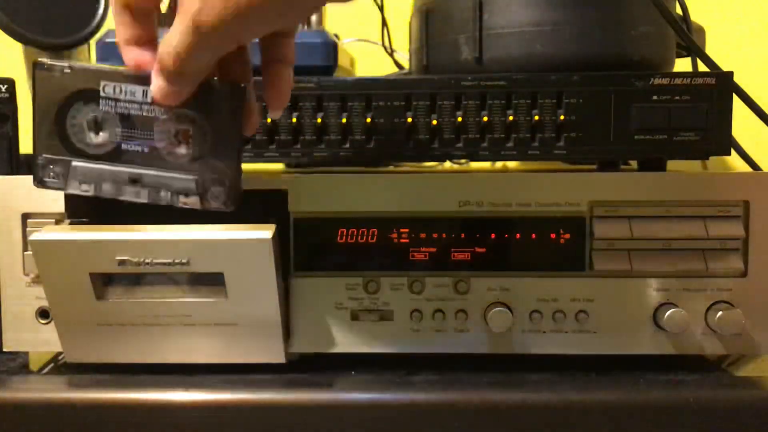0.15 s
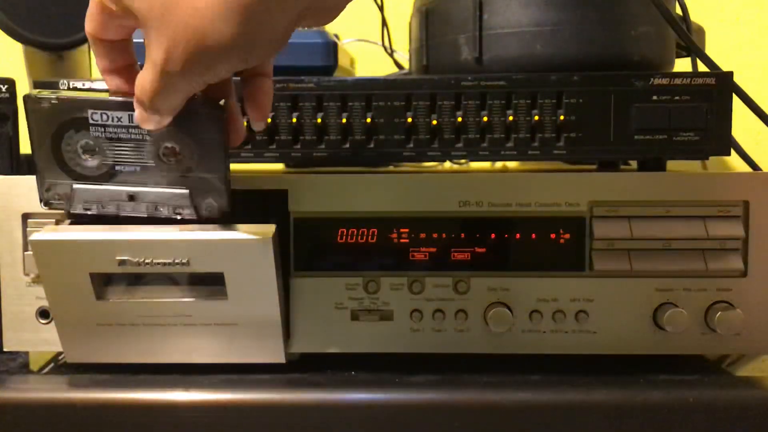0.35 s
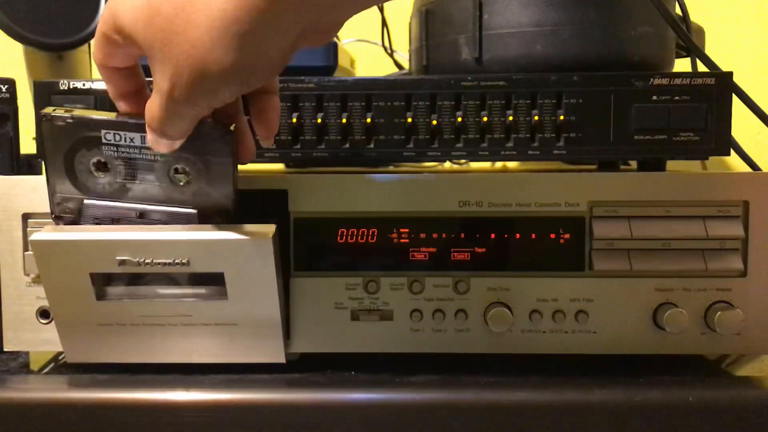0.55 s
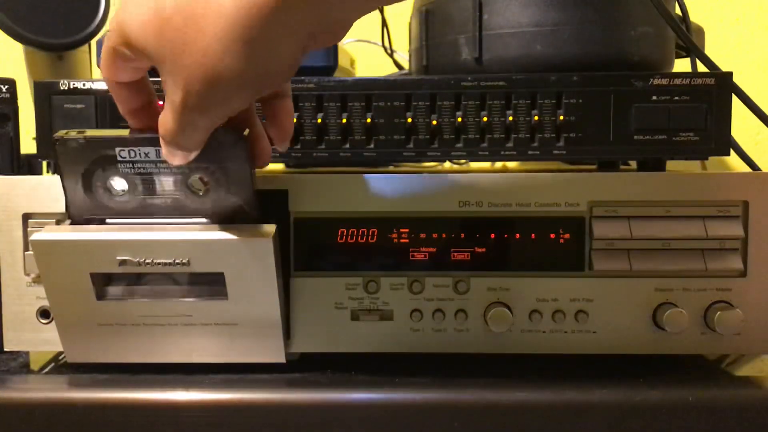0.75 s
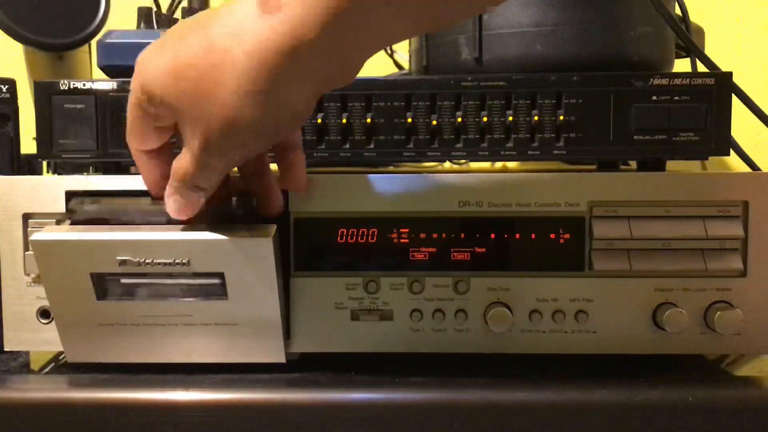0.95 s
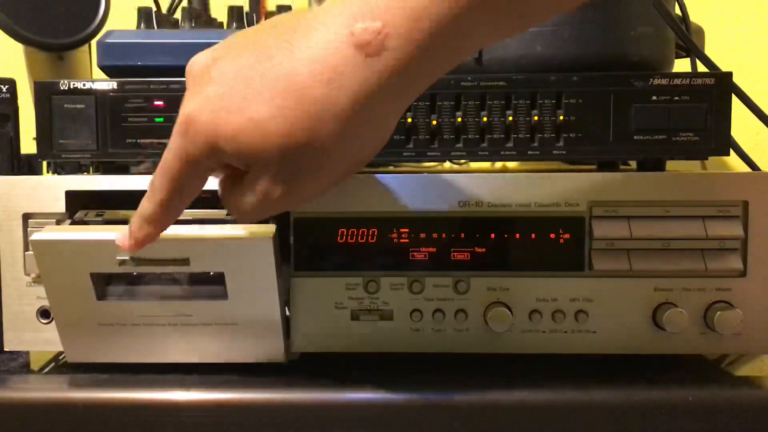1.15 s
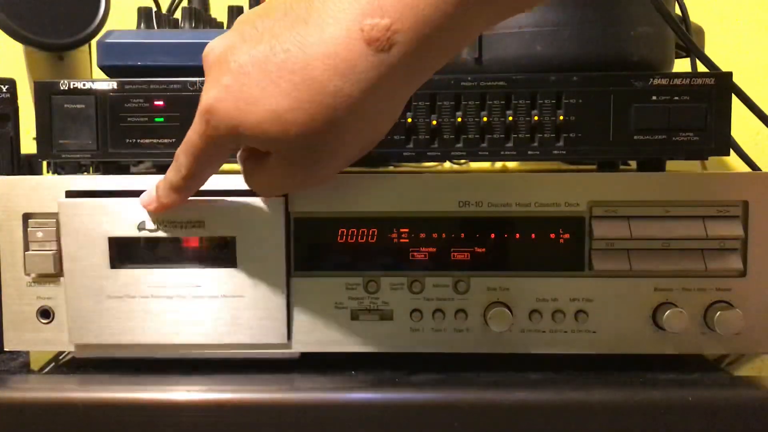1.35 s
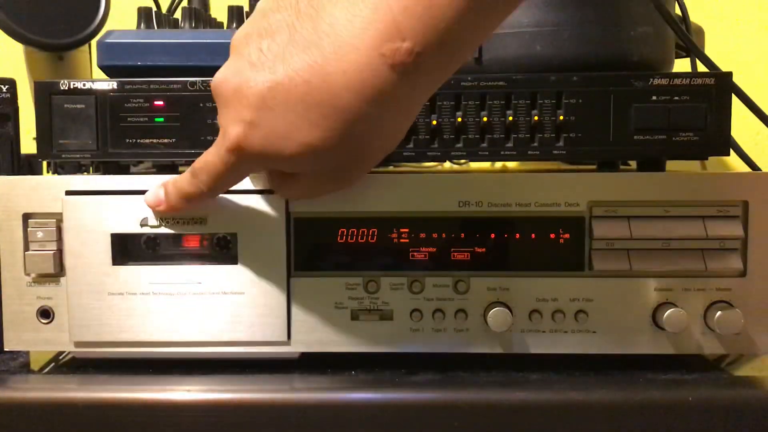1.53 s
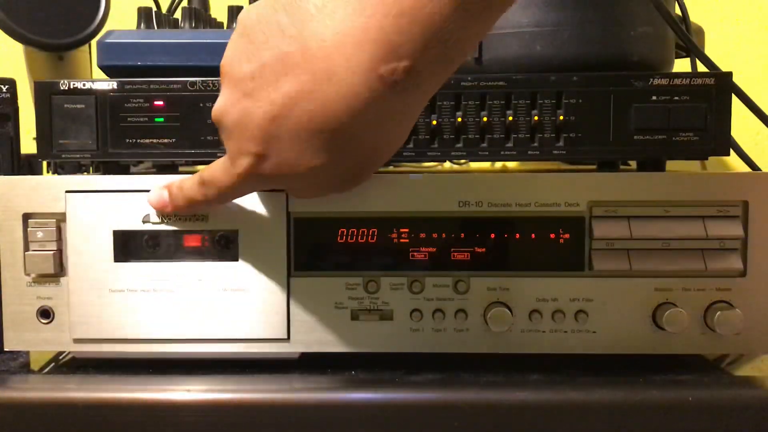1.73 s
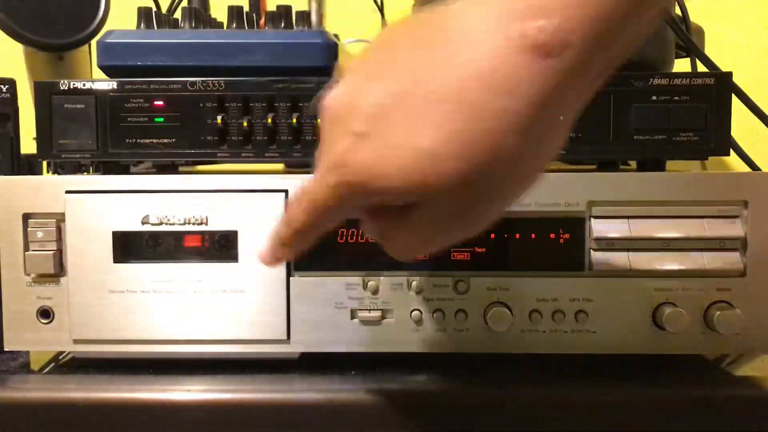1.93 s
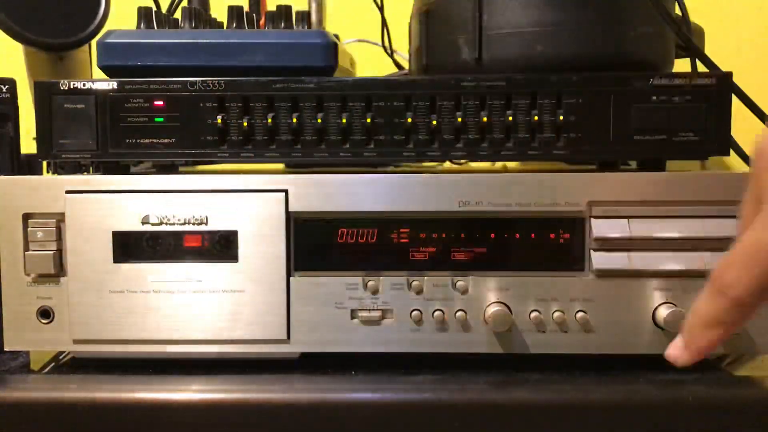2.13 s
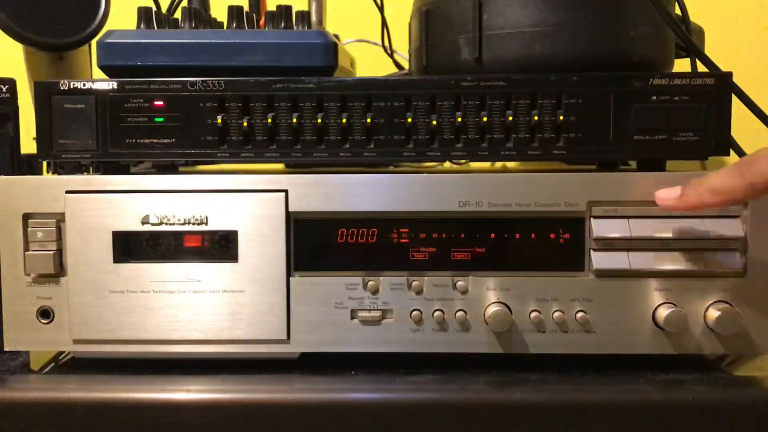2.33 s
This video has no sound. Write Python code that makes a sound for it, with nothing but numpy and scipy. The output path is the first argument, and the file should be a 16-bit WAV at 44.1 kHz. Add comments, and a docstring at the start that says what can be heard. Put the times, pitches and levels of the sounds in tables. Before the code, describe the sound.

Cassette tape loading: light plastic ticks, a scrape and knock home, then the deck door snaps shut

```python
"""Faint mains hum and hiss come first, with small ticks of fingers on a plastic cassette shell.
The shell is fed into the open door of a tape deck in a small room: it ticks against the guides, scrapes
down and drops home. The door rattles as a finger pushes it and latches with a loud clack.
Blows are decaying noise bands plus damped modes; rubbing is noise gated by a stream of tiny clicks."""
import sys
import numpy as np
from scipy import signal
from scipy.fft import rfft, irfft, next_fast_len
from scipy.io import wavfile

SR = 44100
rng = np.random.default_rng(int(sys.argv[2]) if len(sys.argv) > 2 else 0)


def generate_wav(signal):
    """Clip the signal to [-1, 1] and save it as 16-bit WAV at the path in sys.argv[1]."""
    frames = np.transpose(np.atleast_2d(signal))
    scaled = np.clip(frames, -1, 1) * 32767
    pcm = np.round(scaled).astype(np.int16)
    wavfile.write(sys.argv[1], SR, pcm)


N = 105266
TAIL = int(.6 * SR)  # longest decay kept, in samples
BANDS = 31.25 * 2 ** (np.arange(19) / 2)  # half-octave band centres in Hz

# Likeness of the left and right channels. Each row: frequency in Hz, correlation.
LIKENESS = [(100, .99), (600, .975), (1400, .965), (2600, .55), (4000, -.25), (6000, -.35), (9000, -.15)]
# Blows of the cassette against the holder. Each row: start in seconds, level in dB, bass shelf in dB,
# treble shelf in dB, ring T60 in seconds, attack in seconds, note of the spot struck in Hz,
# level of that note in dB re the blow, boom of the well in dB re the blow.
CASSETTE_HITS = [ (0.4628, -22, 7, -8.5, 0.12, 0.0012, 1551, -3, 2),
                 (0.6429, -22.5, 10.5, -2, .085, 0.0039, 2930, -5, -1),
                 (0.6974, -21.5, -0.5, 0.5, 0.047, .0003, 2732, -1, -30),
                 (0.7215, -28.5, 11, 5.5, .035, 0.0015, 2660, 2.5, -33),
                 (0.7505, -20, 8, -14.5, 0.082, 0.00071, 1310, -2.5, -27),
                 (1.0257, -9, 5, -8, 0.055, 0.00027, 1243, -5.5, -7),
                 (1.049, -24.5, 15.5, -20, 0.095, 0.0012, 2108, 5.5, -15),
                 (1.058, -26.5, 1.5, 0, 0.13, 0.0012, 1040, 5.5, -5.5)]
# Blows of the door and its latch. Each row: the same nine columns and units as for the cassette.
DOOR_HITS = [ (1.2377, -41.5, -1, 1.5, 0.17, 0.0011, 1317, 3, -21),
             (1.334, -40, 8, 0, .07, 0.0029, 2150, -6, 7.5),
             (1.3581, -26.5, -6.5, 2, 0.061, 0.00084, 1342, 0.5, -15),
             (1.3721, -30.5, -2, -7, 0.22, 0.0014, 1307, 2, 3),
             (1.402, -22, -8, 6.5, 0.038, 0.0028, 2120, -5, -19),
             (1.4094, -25, -1, -6, 0.039, 0.0022, 683, -1.5, -7),
             (1.547, -46, 17.5, -19, 0.1, 0.0015, 1310, -4.5, -6),
             (1.6583, -4, -8.5, 7, 0.063, 0.0001, 1935, 1, -13),
             (1.6672, -10.5, 4, 16, 0.017, .0005, 2210, -10, -16.5),
             (1.683, -15.5, 6, -10, 0.032, 0.00094, 513, 0.5, -12),
             (1.7958, -31.5, 2, -6.5, 0.09, 0.00048, 1335, 6.5, -4.5),
             (2.0953, -56.5, -17, 7, 0.11, 0.00096, 2176, -21, -13)]


def undb(db):
    """Logarithmic level: decibels to amplitude gain."""
    return 10 ** (np.asarray(db) / 20)


def at(table, hz, column=1):
    """Spectral interpolation: read a column of a table on a log-frequency axis."""
    table = np.array(table, float)
    return np.interp(np.log(hz), np.log(table[:, 0]), table[:, column])


def unit(x):
    """Power normalisation: scale to an rms of 1."""
    return x / np.sqrt(np.mean(x ** 2))


def pan(db):
    """Interchannel level difference: left and right gains, left minus right in dB."""
    return undb(np.array([[db], [-db]]) / 2)


def add(out, start, x):
    """Superposition: mix a sound in at a time in seconds."""
    i = max(int(start * SR), 0)
    out[..., i:i + x.shape[-1]] += x[..., :N - i]


def fade(t, t60):
    """Exponential decay: the level falls by 60 dB in t60 seconds."""
    return np.exp(-np.log(1000) * np.maximum(t, 0) / t60)


def spread(pair, hz):
    """Interchannel coherence: sum and difference of unrelated noises set the likeness of left and right."""
    # Each row: frequency in Hz, left minus right in dB.
    balance = [(200, -1.85), (700, -0.8), (1400, 0.9), (5000, 0.15), (10000, -0.5)]
    correlation = np.clip(at(LIKENESS, hz), -.995, .995)
    common = np.sqrt(1 + correlation) * pair[0]
    opposed = np.sqrt(1 - correlation) * pair[1] * np.array([[1], [-1]])
    return unit(common + opposed) * pan(at(balance, hz))


def band_noise(size):
    """Band filtering: half-octave stereo noises, each with the channel likeness of its frequency."""
    n = next_fast_len(size)
    octave = np.log2(np.maximum(np.arange(n // 2 + 1) * SR / n, 1))
    white = rfft(rng.standard_normal((2, n)))
    bands = []
    for hz in BANDS:
        triangle = np.clip(1 - 2 * abs(octave - np.log2(hz)), 0, 1)
        pair = irfft(white * triangle, n)[:, :size]
        bands.append(spread(pair, hz))
    return np.array(bands)


def ring(modes):
    """Modal vibration: damped sines, each with a random excitation and phase for every blow."""
    scatter_db = 1.5
    t, out = np.arange(TAIL) / SR, 0
    draws = rng.uniform(-1.04, 1, (len(modes), 2))
    for (hz, db, t60), (size, turn) in zip(modes, draws):
        # a phase angle between the channels gives their correlation at this frequency
        apart = np.arccos(np.clip(at(LIKENESS, hz), -1, 1)) * np.array([[.5], [-.5]])
        tone = np.sin(2 * np.pi * (hz * t + turn) + apart)
        out = out + undb(db + scatter_db * size) * fade(t, t60) * tone
    return np.sqrt(2) * out


def blows(hits, colour, modes):
    """Impact excitation: a crack of short noise bands, a few modes and the note of the spot struck."""
    bass_hz, treble_hz, ring_slope = 440, 2780, 0.025  # shelf corners; lows ring slightly longer
    hold_s, rise_cycles, spot_t60_s = 0.0021, 0.99, .06
    out, t, noise = np.zeros((2, N)), np.arange(TAIL) / SR, band_noise(N + TAIL)
    hz, short = BANDS[:, None], t[:TAIL // 3]
    rise = 1 - np.exp(-short * np.minimum(hz, treble_hz) / rise_cycles)
    band_stretch = (treble_hz / hz) ** ring_slope
    bass_shelf = 1 / (1 + (BANDS / bass_hz) ** 2)
    treble_shelf = 1 / (1 + (treble_hz / BANDS) ** 2)
    for start, db, bass_db, treble_db, t60, attack_s, spot_hz, spot_db, *_ in hits:
        i = max(int(start * SR), 0)
        contact = np.minimum(t / max(attack_s, 1 / SR), 1)
        decay = fade(short - hold_s - attack_s / 2, t60 * band_stretch)
        env = contact[:len(short)] * rise * decay
        crack = noise[:, :, i:i + len(short)] * env[:, None]
        # random noise varies in energy; even it out so that each band gets its due
        even = np.sqrt((env ** 2).sum(1) / (crack ** 2).mean(1).sum(1))
        shelves = bass_db * bass_shelf + treble_db * treble_shelf
        gains = even * undb(db + at(colour, BANDS) + shelves)
        add(out, start, np.tensordot(gains, crack, 1))
        notes = ring([*modes, (spot_hz, spot_db, spot_t60_s)])
        add(out, start, undb(db) * notes * contact * (1 - np.exp(-t * treble_hz)))
    return out


def slide(curve, colour):
    """Stick-slip friction: coloured noise follows a stream of tiny clicks and a level curve."""
    grains_per_s, grain_spread_db, grain_t60_s = 520, 3, .018
    sizes = undb(grain_spread_db * rng.standard_normal(N))
    catches = (rng.random(N) < grains_per_s / SR) * sizes
    # the energies of overlapping clicks add
    energy = signal.lfilter([1], [1, -fade(1 / SR, grain_t60_s) ** 2], catches ** 2 + 1e-18)
    grains = np.sqrt(energy)
    times, db = np.array(curve).T
    # silent outside the curve
    pressure = undb(np.interp(np.arange(N) / SR, times, db, left=-np.inf, right=-np.inf))
    noise = np.tensordot(undb(at(colour, BANDS)), band_noise(N), 1)
    return noise * unit(grains) * pressure


def body(x, resonances):
    """Resonant filtering: peaks and dips of the plastic part lift or thin its clatter."""
    for hz, width, db in resonances:
        peak = signal.lfilter(*signal.iirpeak(hz, hz / width, fs=SR), x)
        x = x + (undb(db) - 1) * peak
    return x


def background():
    """Stationary noise and periodic hum: broad room air, mains tones and two narrow noise bands."""
    # Steady noise. Each row: frequency in Hz, level in dB per half octave.
    floor = [(30, -68), (60, -72), (140, -65.5), (300, -74.5), (550, -67.5), (900, -72), (1500, -71),
             (2400, -72), (3500, -70), (5000, -76.5), (9000, -76), (15000, -75)]
    # Mains hum. Each row: frequency in Hz, level in dB.
    hum = [(49.5, -59.5), (100, -68.5), (149.5, -63.5), (250, -64.5), (350, -68.5)]
    # A narrow wavering low band and a thin high hiss. Each row: frequency in Hz, width in Hz, level in dB.
    narrow_bands = [(483, 21, -63), (6720, 290, -67.5)]
    t, freq = np.arange(N) / SR, np.arange(N // 2 + 1) * SR / N
    out = np.tensordot(undb(at(floor, BANDS)), band_noise(N), 1)
    for hz, db in hum:
        out = out + np.sqrt(2) * undb(db) * np.sin(2 * np.pi * (hz * t + rng.random()))
    for hz, width, db in narrow_bands:
        shape = np.exp(-.5 * ((freq - hz) / width) ** 2)
        pair = irfft(rfft(rng.standard_normal((2, N))) * shape, N)
        out = out + undb(db) * spread(pair, hz)
    return out


def room(x):
    """Reverberation: convolution with decaying noise bands, as from a small furnished room."""
    # Each row: frequency in Hz, level in dB, T60 in seconds.
    reflections = [(60, -4.5, 0.53), (160, -5, 0.49), (440, -9.5, 0.3), (1313, -12.5, 0.24),
                   (2800, -14, 0.22), (6013, -7, 0.16), (15050, -12.5, 0.31)]
    delay_s, build_s = 0.0051, 0.0025
    t, response = np.arange(TAIL) / SR, 0
    build = np.clip((t - delay_s) / build_s, 0, 1)
    for hz, noise in zip(BANDS, band_noise(TAIL)):
        tail = noise * build * fade(t, at(reflections, hz, column=2))
        bandwidth_gain = np.sqrt(hz / 2 / SR / TAIL)
        response = response + unit(tail) * undb(at(reflections, hz)) * bandwidth_gain
    return signal.fftconvolve(x, response, axes=1)[:, :N]


def cabinet():
    """Cavity and panel resonance: the hollow well booms just after each blow; the case thuds dully."""
    # Boom of the well. Each row: frequency in Hz, level in dB re the boom, T60 in seconds.
    well_modes = [(484, 2.5, .072), (520, -4, .05)]
    # Dull bumps of the case. Each row: start in seconds, level in dB, pitch in Hz.
    bumps = [(1.026, -21, 104.4), (1.248, -42, 140), (1.253, -36.5, 91.5), (1.296, -34.5, 125),
             (1.659, -19.5, 274.6), (1.66, -26.5, 112.5), (1.816, -34, 158.5), (1.812, -32.5, 223)]
    well_delay_s, well_rise_s, bump_t60_s = .016, .002, 0.18
    out, t = np.zeros((2, N)), np.arange(TAIL) / SR
    for start, db, *_, boom_db in CASSETTE_HITS + DOOR_HITS:
        boom = ring(well_modes) * (1 - np.exp(-t / well_rise_s))
        add(out, start + well_delay_s, undb(db + boom_db) * boom)
    for start, db, hz in bumps:
        thud = ring([(hz, 0, bump_t60_s)]) * (1 - np.exp(-t * hz))
        add(out, start, undb(db) * thud)
    return out


def rustle():
    """Light friction: a faint rustle as the hand moves away."""
    # Each row: time in seconds, level in dB.
    curve = [(2.02, -78), (2.07, -64.5), (2.39, -66.5)]
    # Each row: frequency in Hz, level in dB per half octave.
    colour = [(700, -14.5), (3400, -8), (6000, -13.5)]
    return slide(curve, colour)


def handling():
    """Soft impacts on a held shell: fingers shift on the plastic and excite its modes."""
    # Each row: start in seconds, level in dB, bass shelf in dB, treble shelf in dB, ring T60 in seconds.
    touches = [ (.003, -38.5, -12, 2.5, 0.15), (0.075, -52, 13.5, -5, 0.076),
               (0.161, -43.5, -2, -3.5, 0.18), (0.2377, -42.5, 13, 13.5, 0.018),
               (.374, -44.5, 4, 5.5, 0.045), (0.3865, -38.5, -6, -6.5, 0.14)]
    # One finger touch: attack in seconds, note in Hz, level of that note in dB re the touch.
    finger = (0.00034, 2750, -1)
    # Colour of the crack. Each row: frequency in Hz, level in dB per half octave.
    colour = [(100, -17), (500, -21.5), (900, -22), (1300, -23.5), (2000, -11.5), (2800, -8), (4300, -13),
              (7000, -14), (15000, -33.5)]
    # Each row: frequency in Hz, level in dB re the touch, T60 in seconds.
    modes = [(1246, -8.5, 0.076), (2160, -10.5, 0.097)]
    hits = [(*touch, *finger) for touch in touches]
    return blows(hits, colour, modes) * pan(3.5)


def scrape():
    """Friction-driven resonance: the shell slides down the guides, ringing faintly, and snags."""
    # Sliding friction. Each row: time in seconds, level in dB.
    curve = [(.612, -59), (.622, -45), (.715, -47), (.742, -27), (.78, -36), (.815, -52), (.841, -44.5),
             (.91, -42), (.955, -36), (1.0, -42.5), (1.022, -32), (1.04, -65)]
    # Colour of the friction. Each row: frequency in Hz, level in dB per half octave.
    colour = [(50, -52), (130, -19), (600, -13.5), (1300, -9), (2800, -8.5), (4500, -15.5), (8000, -21.5),
              (15000, -33)]
    # Resonances excited by the rubbing. Each row: frequency in Hz, width in Hz, gain in dB.
    resonances = [(1270, 53, 6.5), (1917, 110, 6.5), (2730, 190, 6)]
    # Snags on the way down. Each row: start in seconds, level in dB, treble shelf in dB, note in Hz.
    snags = [(0.854, -38.5, 1, 2760), (.875, -44, 11, 1970), (0.923, -35.5, 8.5, 1253),
             (.942, -35, 10.5, 2050), (0.9482, -36.5, -5, 1210), (0.9621, -30, -2, 1317),
             (0.9844, -28.5, -18, 1350)]
    t60_s, attack_s, note_db = 0.048, 0.00045, -8.5
    hits = [(start, db, 0, treble_db, t60_s, attack_s, hz, note_db) for start, db, treble_db, hz in snags]
    return body(slide(curve, colour) + blows(hits, colour, []), resonances)


def cassette():
    """Impact and friction of a thin shell: it strikes the holder, scrapes down and drops home."""
    # Colour of a blow. Each row: frequency in Hz, level in dB per half octave.
    colour = [(50, -28.5), (130, -26.5), (300, -22), (550, -11.5), (900, -16), (1350, -12), (2000, -8.5),
              (2900, -7), (4300, -12.5), (6500, -14), (9000, -16.5), (15000, -23)]
    # Each row: frequency in Hz, level in dB re the blow, T60 in seconds.
    modes = [(465.7, -14, 0.21), (696, -15.5, 0.056), (1010, -20, 0.082), (1040, -21, .12),
             (1188, -25, 0.047), (1305.6, -10, 0.07), (1571, -7.5, 0.055), (2076, -7.5, 0.042),
             (3890, -15, 0.036), (4300, -25, 0.041)]
    # Broad resonances and dips of the plastic. Each row: frequency in Hz, width in Hz, gain in dB.
    resonances = [(1360, 91, 4), (1760, 180, -1.5), (2388, 150, -3), (6550, 300, 4), (9030, 590, 5.5)]
    clatter = blows(CASSETTE_HITS, colour, modes) + scrape()
    return body(clatter, resonances) * pan(1.5)


def latch():
    """Friction and modal ringing: the latch rides up its ramp and its tongue chatters."""
    # Rub up the ramp. Each row: time in seconds, level in dB.
    curve = [(1.615, -61), (1.632, -45), (1.645, -35), (1.657, -22.5), (1.665, -58.5)]
    # Colour of the rub. Each row: frequency in Hz, level in dB per half octave.
    colour = [(100, -25), (1000, -7), (2000, -9.5), (2900, -15.5), (4500, -30), (15000, -52.5)]
    # Chatter before and after the tongue catches. Each row: start in seconds, level in dB.
    chatter = [(1.6425, -29), (1.7395, -24.5), (1.7465, -21)]
    # Each row: frequency in Hz, level in dB re the chatter, T60 in seconds.
    modes = [(1800, -8.5, 0.034), (2110, -0.5, 0.033), (2190, -5, .03), (2780, -14.5, .02)]
    rise_s = 0.00059
    out, t = slide(curve, colour), np.arange(TAIL) / SR
    for start, db in chatter:
        add(out, start, undb(db) * ring(modes) * (1 - np.exp(-t / rise_s)))
    return out


def door():
    """Impact and friction of a hinged panel: the door rubs and rattles inward, then latches."""
    # Colour of a blow and of the rub. Each row: frequency in Hz, level in dB per half octave.
    colour = [(50, -28), (130, -14.5), (300, -18.5), (600, -5), (900, -7), (1350, -5), (2000, -5.5),
              (3200, -9.5), (4800, -14), (7000, -26), (10000, -23), (15000, -32)]
    # Each row: frequency in Hz, level in dB re the blow, T60 in seconds.
    modes = [(437, -24, .16), (730, -19, .14), (790, -18, .13), (1310, -22, .13), (1476, -24, .15),
             (1626, -24, .14), (1806, -20, .15), (1969, -18, .13), (2164, -17, .13), (3146, -14, .1),
             (3344, -14, .08), (489, -40, 1.1), (1690, -46, .8)]
    # Rub as the door swings in. Each row: time in seconds, level in dB.
    hinge_rub = [(1.295, -58.5), (1.312, -46), (1.35, -44.5), (1.395, -31.5), (1.415, -35.5), (1.44, -59.5)]
    # Broad resonances and dips of the plastic. Each row: frequency in Hz, width in Hz, gain in dB.
    resonances = [(885, 180, -13.5), (2380, 97, -13), (3840, 200, 4), (4722, 460, -4.5), (9020, 2700, 0.5)]
    clatter = blows(DOOR_HITS, colour, modes) + slide(hinge_rub, colour) + latch()
    return body(clatter, resonances) * pan(1.04)


def scene():
    """Superposition: direct clatter and its reverberation over the cabinet and the background."""
    clatter = handling() + cassette() + door() + rustle()
    return clatter + room(clatter) + cabinet() + background()


def record(dry):
    """Soft saturation and low-pass filtering: the recorder rounds the loudest peaks and cuts the top."""
    top_hz = 15800
    rounded = dry / (1 + dry ** 4) ** (1 / 4)
    lowpass = signal.ellip(8, .2, 60, top_hz, fs=SR, output="sos")
    return signal.sosfilt(lowpass, rounded)


dry = scene()
out = record(dry)
generate_wav(out)
```